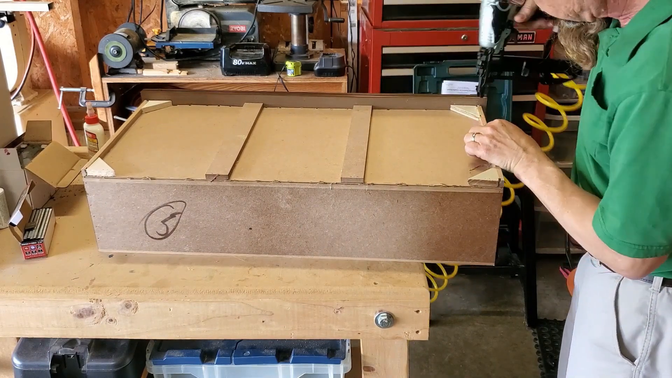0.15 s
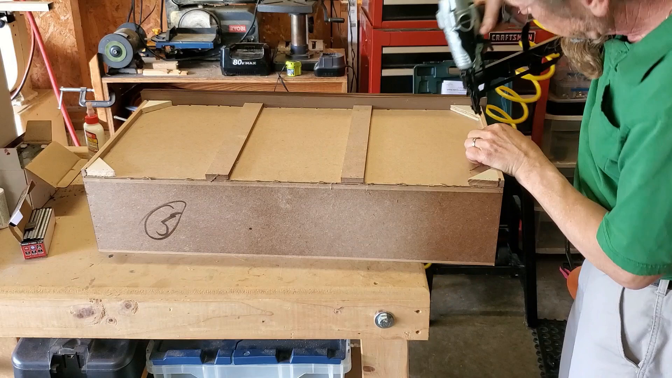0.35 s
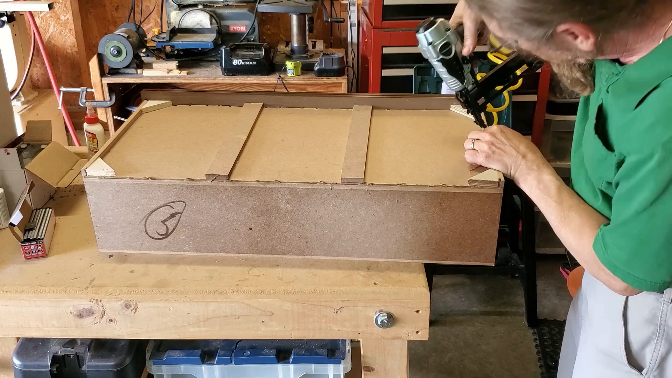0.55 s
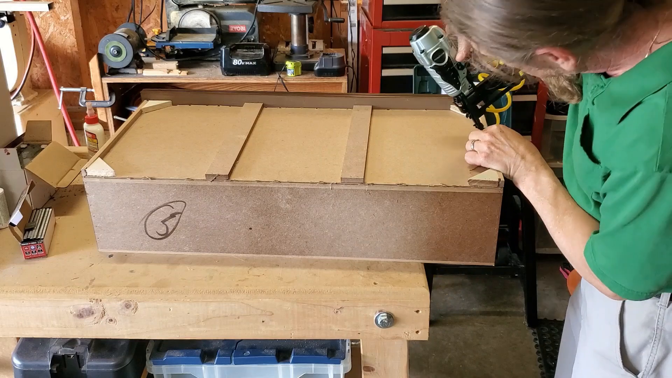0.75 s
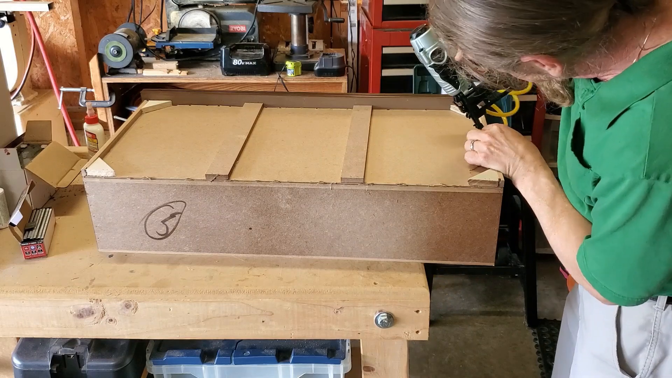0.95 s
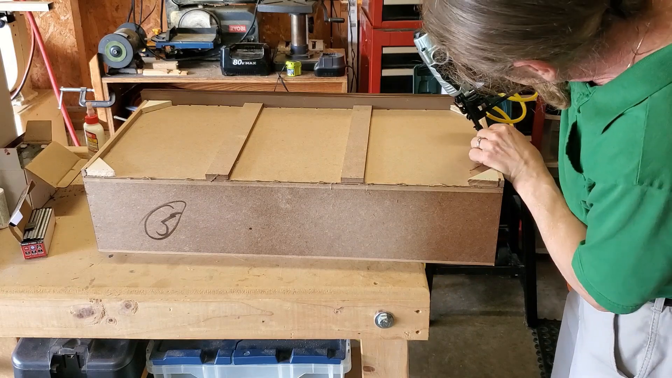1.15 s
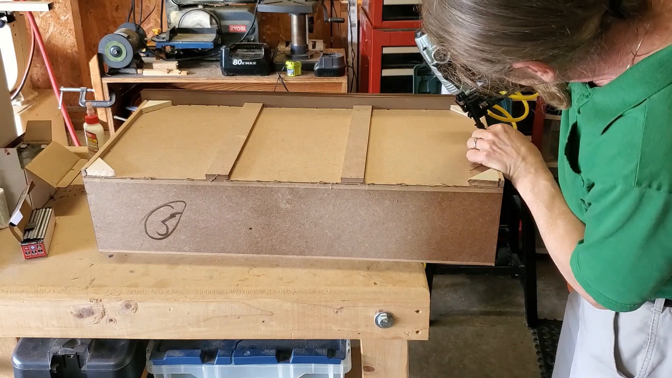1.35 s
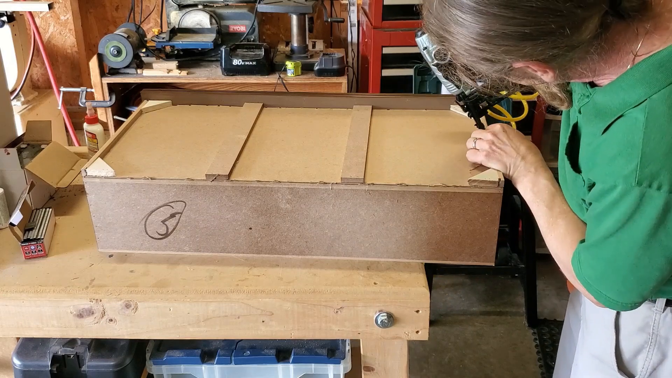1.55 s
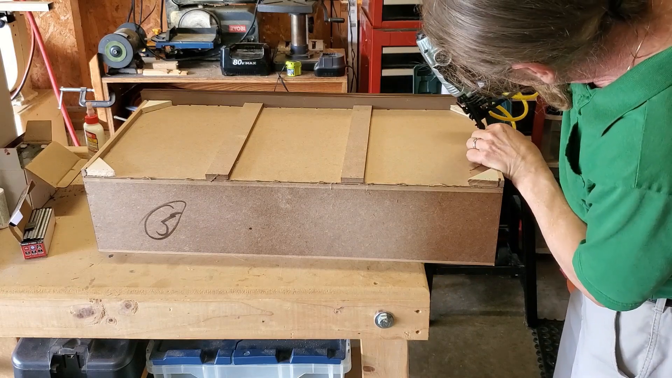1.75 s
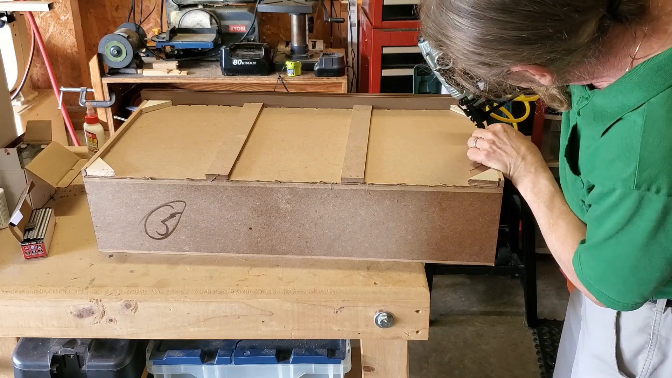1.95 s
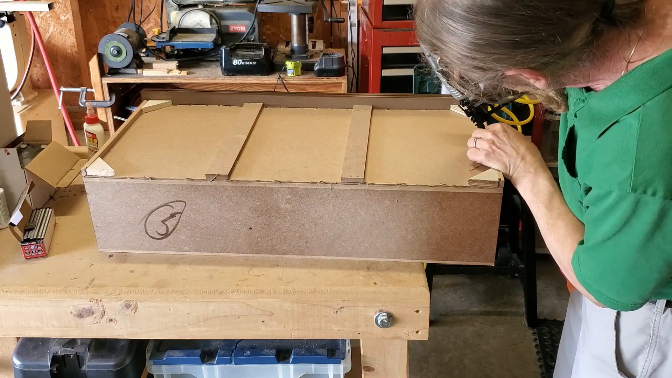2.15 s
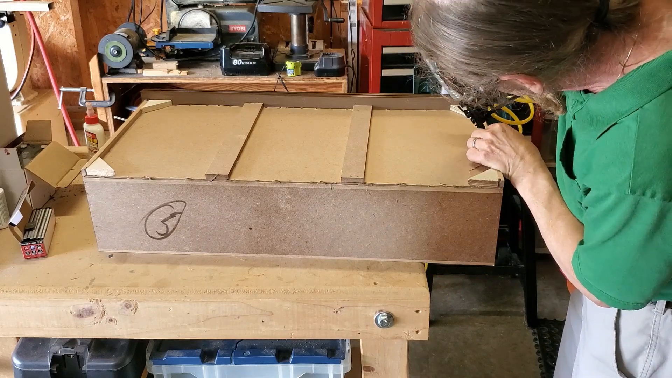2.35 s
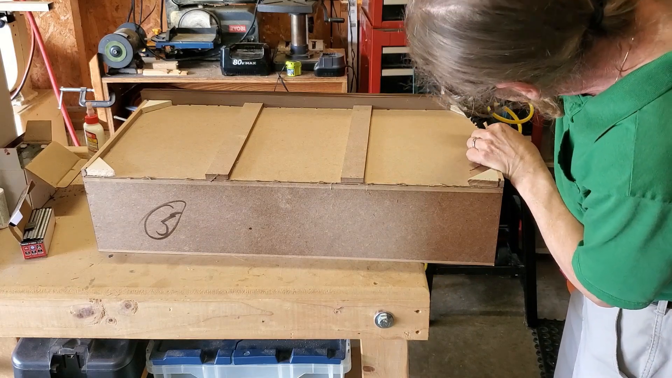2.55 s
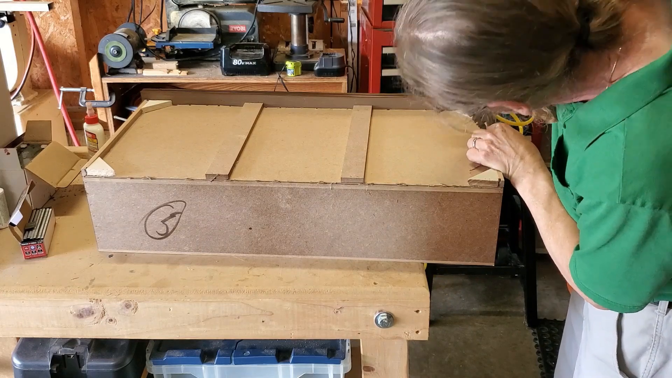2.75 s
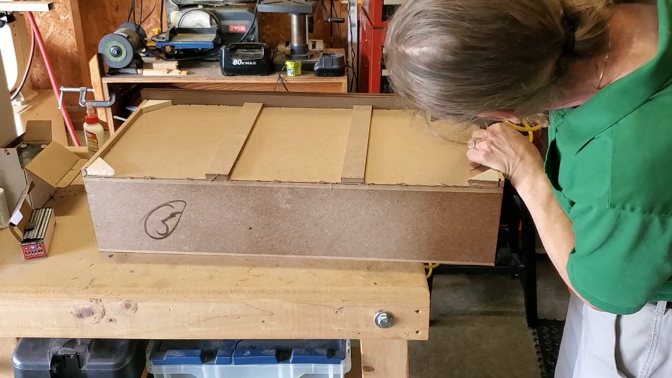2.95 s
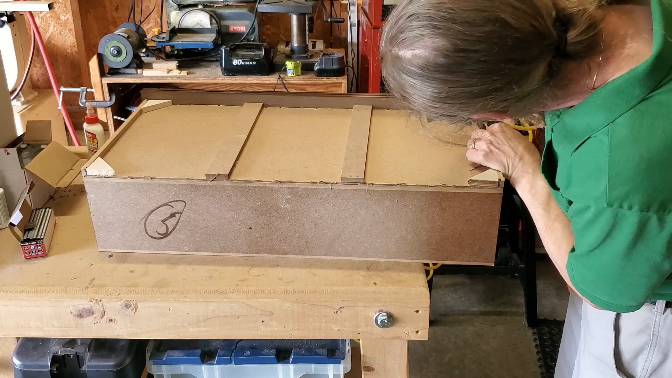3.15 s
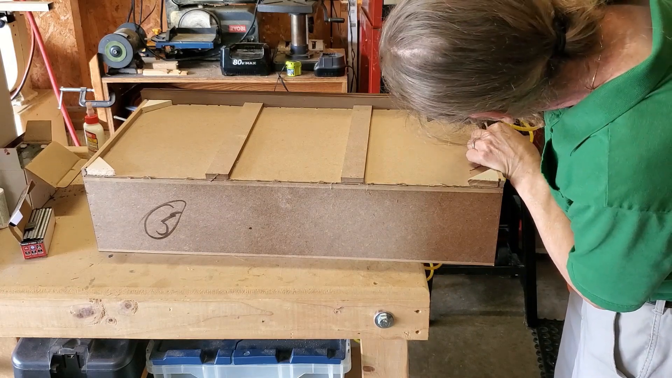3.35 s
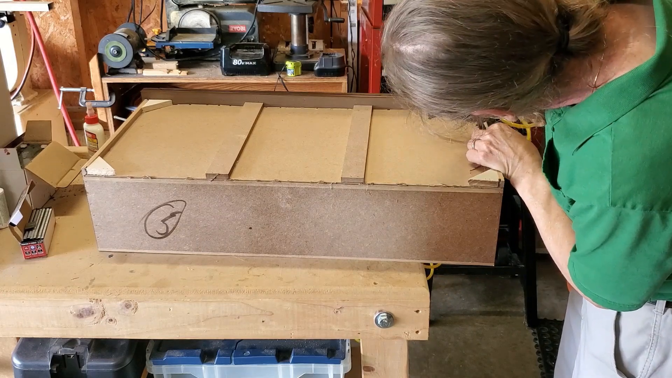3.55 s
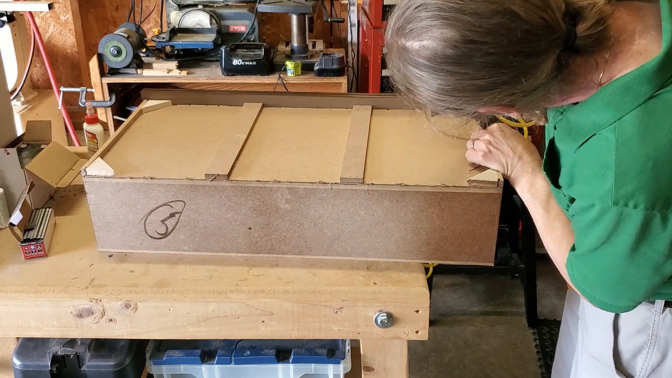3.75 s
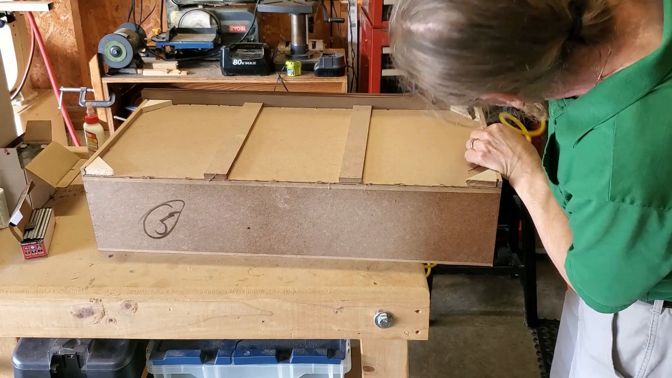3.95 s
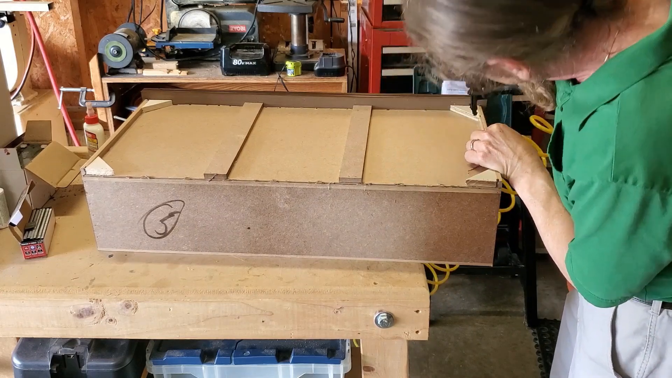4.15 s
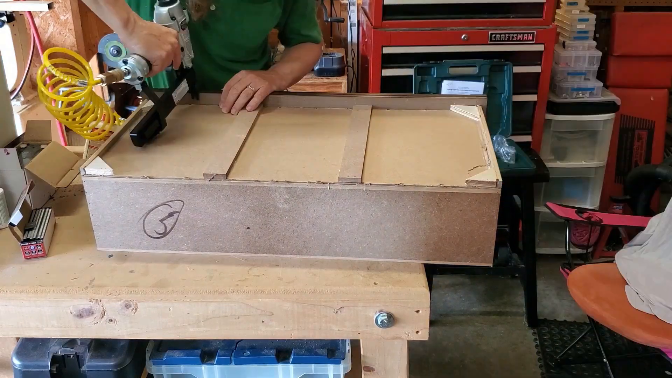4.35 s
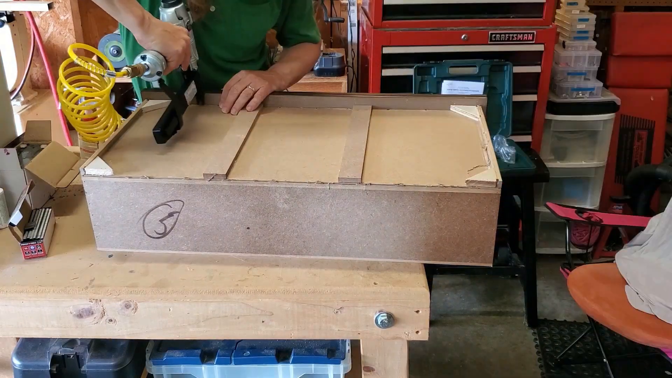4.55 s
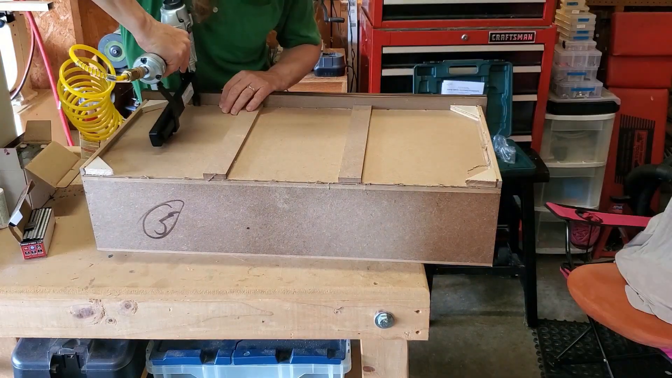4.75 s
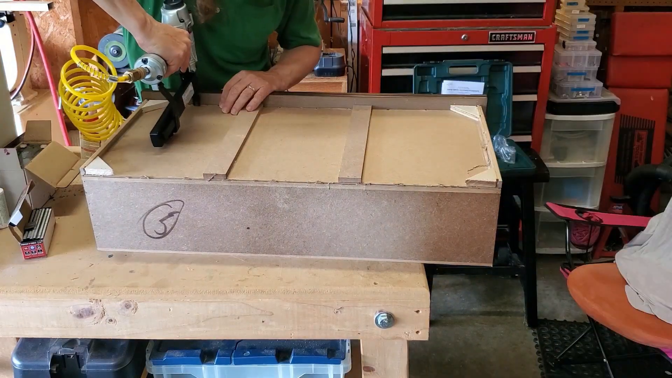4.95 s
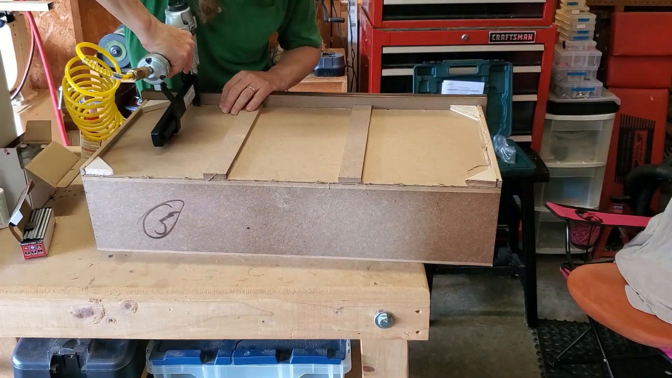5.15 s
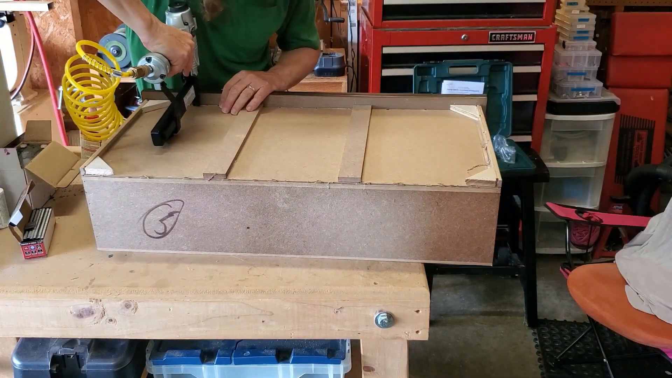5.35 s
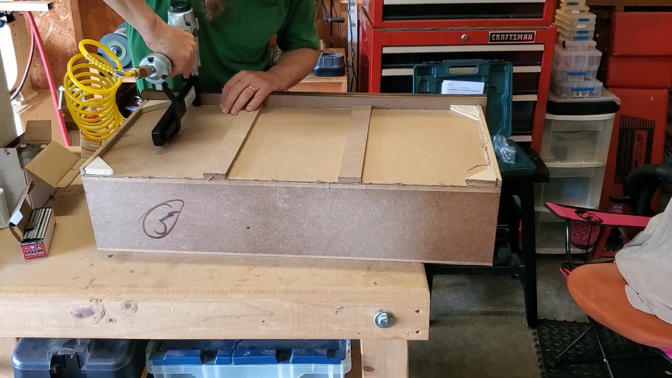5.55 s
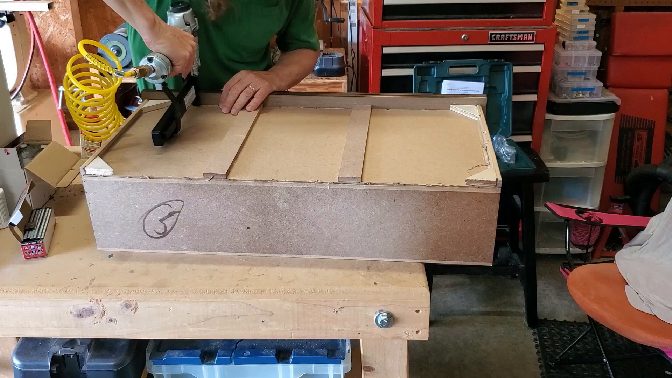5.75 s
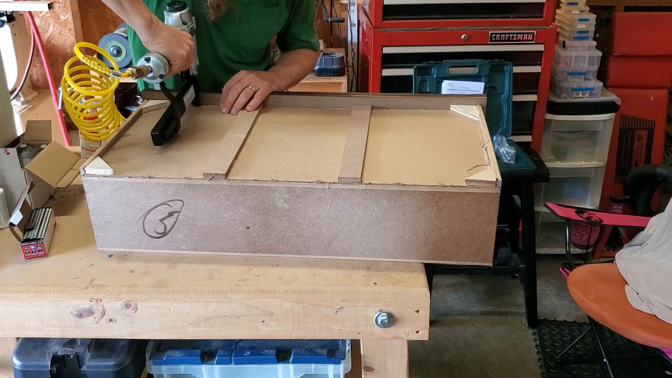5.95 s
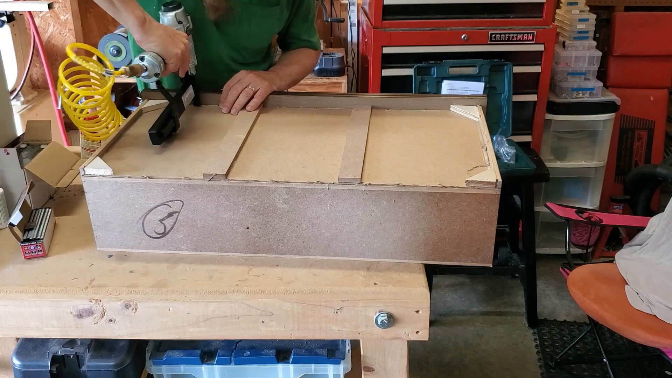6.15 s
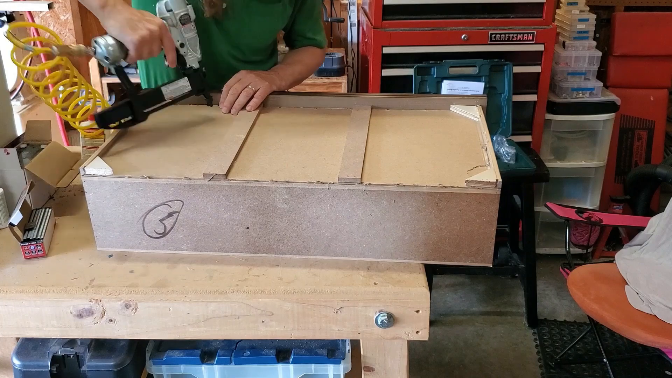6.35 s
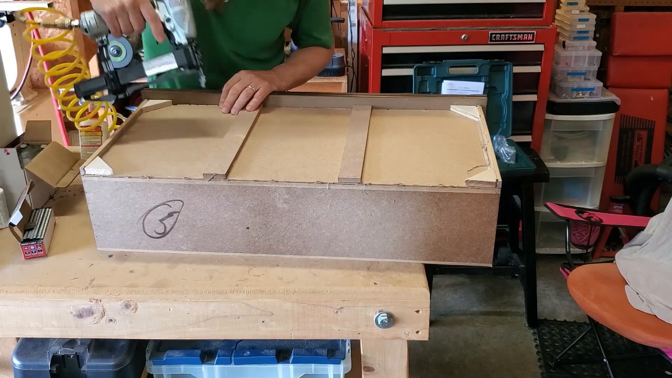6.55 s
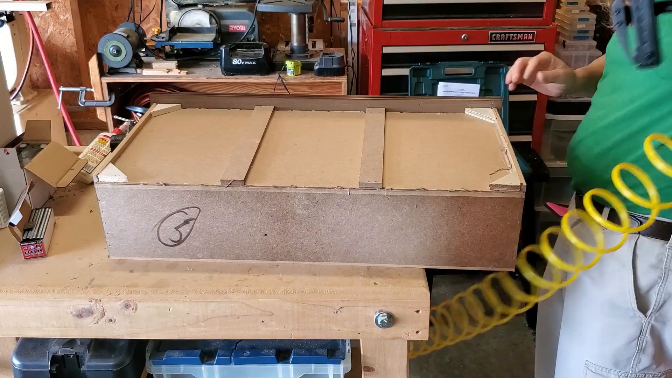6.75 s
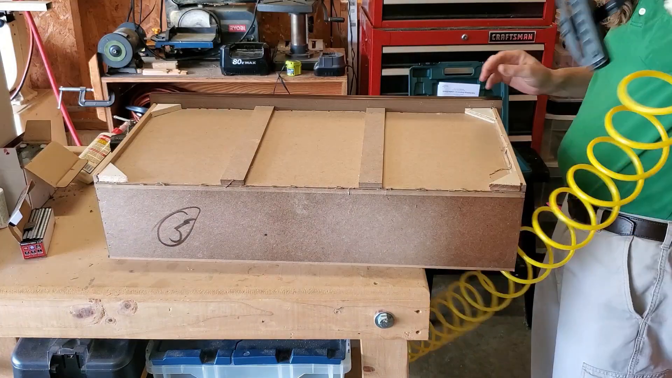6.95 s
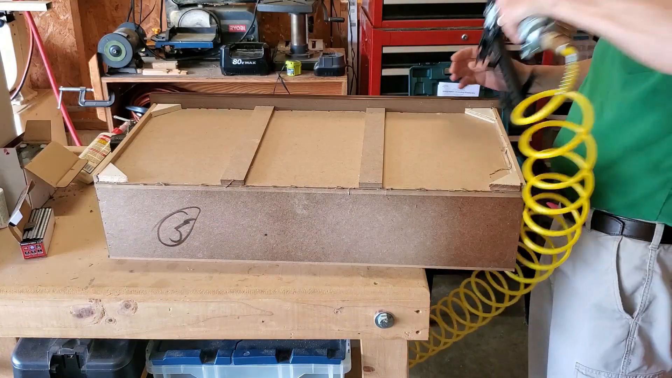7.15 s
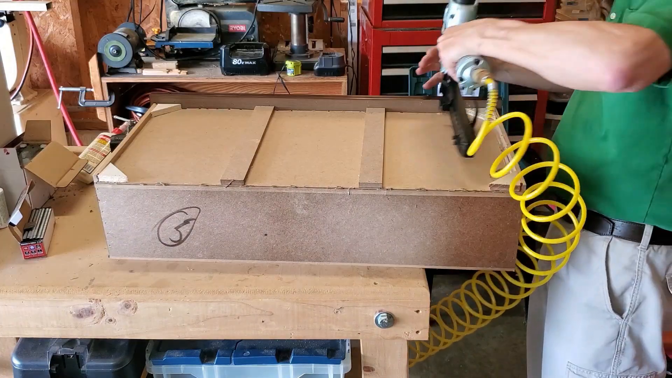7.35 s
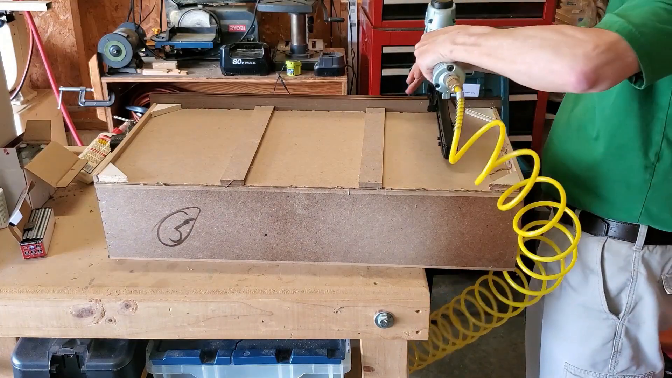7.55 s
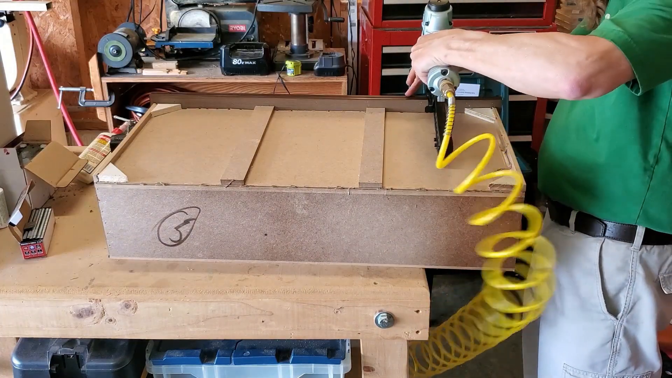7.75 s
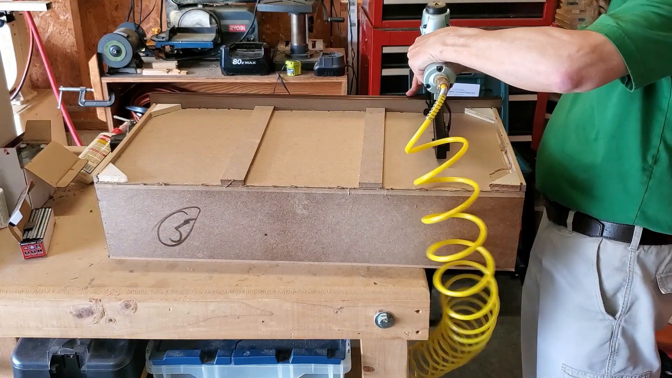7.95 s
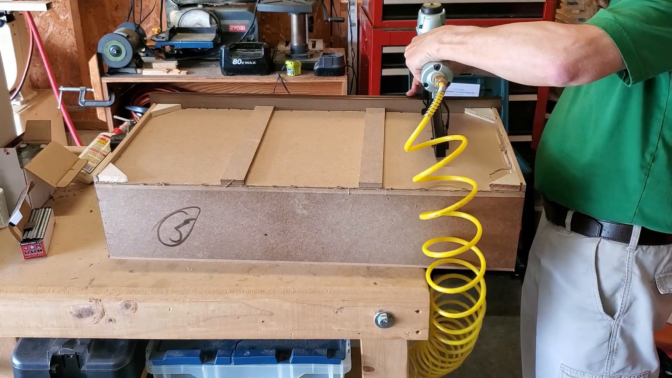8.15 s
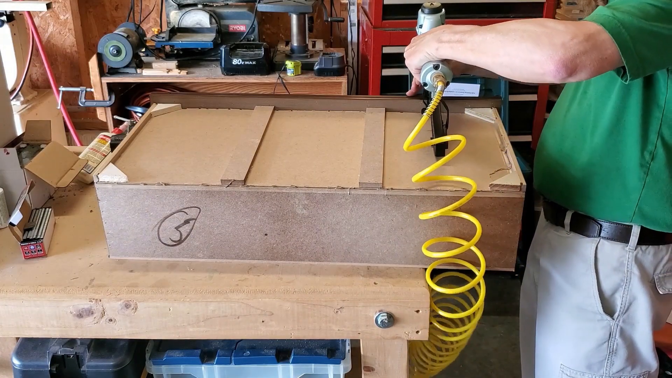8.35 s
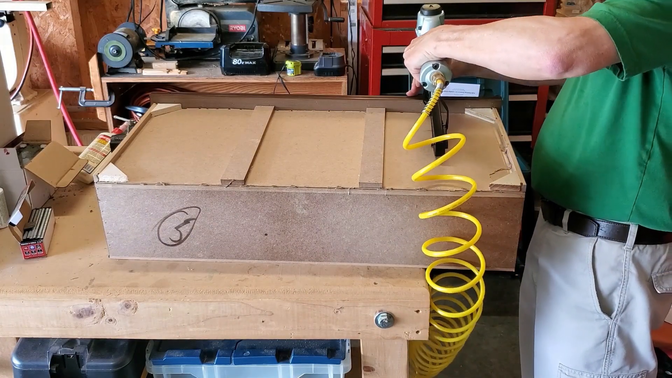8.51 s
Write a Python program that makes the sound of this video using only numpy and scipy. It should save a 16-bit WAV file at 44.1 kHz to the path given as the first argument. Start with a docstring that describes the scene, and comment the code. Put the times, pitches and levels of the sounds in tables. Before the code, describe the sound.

In a small workshop, faint knocks and rubbing come from hands and a tool on a wooden cabinet. A pneumatic stapler fires one loud, sharp shot that rings the panels, followed by a short hiss of air. After more soft bumps, a second shot and puff follow. Then the cabinet scrapes briefly over the bench and the tool clacks against it several times. A nearby microphone picks up a faint low drone underneath.

```python
"""A workshop bench, heard through a phone's two microphone ports. Hands and a pneumatic stapler knock
and rub on a board cabinet. At 3.5 s a staple goes into the near corner: pressure blast, crack, ringing
panels, the limiter ducking; the exhaust hisses as the trigger is let go. After more handling, the far
corner gets its staple at 5.9 s. From 7.6 s the cabinet slides over the bench and the tool is set down
on its front, in plain view of the microphone. A low drone and a faint hiss lie under it all."""
import sys
import numpy as np
from scipy import signal
from scipy.fft import rfft, irfft
from scipy.io import wavfile
from scipy.ndimage import uniform_filter1d, minimum_filter1d

SR = 44100
rng = np.random.default_rng(int(sys.argv[2]) if len(sys.argv) > 2 else 0)


def unload_audio(sound):
    """Save the sound as a 16-bit wav file, at the path given as the first command line argument."""
    columns = np.transpose(np.atleast_2d(sound))
    # keep every value between -1 and 1, then stretch to whole-number steps
    steps = np.round(np.clip(columns, -1, 1) * 32767)
    wavfile.write(sys.argv[1], SR, steps.astype(np.int16))


N = 378378
RING = 2 ** 15  # samples in one blow or echo
AGE, TIME = np.arange(RING) / SR, np.arange(N) / SR

# Levels in the tables are relative: each source adds its own trim.
# shots, near corner then far: t/s, blast/dB, blast time constant/s, crack/dB, panels/dB, air spit/dB,
# direct path of crack and panels/dB, room swell/s, left port lag/s
STAPLE_SHOTS = [(3.4716, 10, 0.00035, -6.5, -13, -30, -13, 0.0042, .00006),
                (5.9281, 14, 0.00048, -10.5, -18.5, -22, 10, 0.0038, -.0001)]
# crack spectra, near corner then far: f/Hz, level/dB
CRACK_SPECTRA = [
    [(35, -51.5), (60, -17.5), (193, -17), (227, -7), (315, -13.5), (540, -4.5), (968, -10), (2090, -2.5),
     (2350, -8), (3670, -11), (16000, -24)],
    [(35, -10), (60, -32), (108, -26), (172, -7.5), (417, -10), (480, -27), (1040, -9), (1660, -2.5),
     (7570, -21.5), (14600, -18.5), (16000, -19.5)],
]
# trigger let go: t/s, valve/dB, air/dB, air t60/s, piston return delay/s, piston knock/dB
TRIGGER_RELEASES = [(3.6644, -25.5, -11.5, 0.13, 0.031, -24), (6.1004, -41, -18.5, 0.075, .0335, -21)]
# cabinet modes: f/Hz, t60/s, level struck at the near corner/dB, at the far corner/dB, bumped/dB
CABINET_MODES = [(77.5, 0.21, -7, -9.5, -32), (181, 0.34, -6.5, -5, -6), (232, 0.14, 0, -8.5, 3.5),
                 (378.3, 0.68, -10, -15, -12), (434, 0.17, 0, -0.5, -4), (560, 0.12, 0, -17, 1.5),
                 (660, 0.083, -1, 14, -9), (776, 0.077, -0.5, 3, -1), (931, 0.46, -12, -1, -14),
                 (1127, 0.14, -13.5, 10.5, -14), (1228, 0.071, -9.5, 10, -7.5), (1493, 0.062, 0, -1, -10),
                 (2070, 0.12, -1.5, -21, -26)]
# stapler body and magazine modes: f/Hz, level/dB, t60/s
STAPLER_MODES = [(1600, -4, 0.02), (2670, 5, 0.013), (3240, 3, 0.026), (3560, 1, 0.02), (3854, 4.5, 0.02),
                 (6830, -10, 0.1)]
# tool on cabinet: t/s, strength/dB, weight behind it/dB, metal in the contact/dB,
# board pitch/Hz, board flex/dB, box pitch/Hz, box ring/dB
TOOL_KNOCKS = [(0.778, -60, 3, -0.5, 237, -2, 666, -1.5), (1.062, -55.5, -2, -2, 248, -2.5, 554, -13),
               (1.29, -44, -5, 6, 213, -15, 543, -6), (1.39, -48, -8, 9.5, 260, -11, 560, -8),
               (2.076, -52, -6, 0, 106, 15, 560, -4.5), (4.351, -51, 11, 3.5, 184, 13, 567, 7),
               (4.518, -52, 7, 13.5, 218, 7.5, 518, 2), (4.616, -48.5, -12, -2.5, 250, -18, 610, -15),
               (5.283, -47.5, 5, 0, 192, 11, 502, -8.5), (6.761, -39.5, -8.5, 0.5, 242, -6.5, 1326, -6.5),
               (6.897, -37.5, -11.5, -17.5, 225, -20, 750, -13),
               (7.001, -26.5, -12.5, -2.5, 179, -5, 694, -14.5), (7.207, -47, -10, -8, 250, -1, 660, -7),
               (7.264, -38, -3, -6.5, 197, -2.5, 650, -2), (7.602, -37, -1.5, -1.5, 285, -6.5, 1455, -6),
               (7.746, -33, 2, -17.5, 271, 4.5, 433, -9), (7.914, -30.5, -7, -2.5, 246, 1.5, 603, 2),
               (7.92, -31, -3, -11.5, 239, 0, 560, -3), (8.133, -35.5, 0.5, -7, 232, -1.5, 580, 3.5)]
# small sharp ticks, one just before the second shot: t/s, level/dB
SHARP_TICKS = [(0.706, -55.5), (4.402, -53), (5.298, -51.5), (5.916, -39), (6.751, -50), (8.1071, -37),
               (8.303, -49.5), (8.364, -54.5)]
# hands on the boards: t/s, strength/dB, softness/dB (more bench heave, less board)
HAND_BUMPS = [(0.354, -66.5, -9.5), (0.442, -63, -8.5), (1.827, -70.5, -18.5), (2.023, -59, -12.5),
              (2.082, -56.5, 20), (2.696, -53.5, 3), (4.681, -40, 2.5), (4.72, -46.5, 11),
              (4.788, -48.5, 8.5), (4.825, -54, 8), (4.962, -56, 14.5), (5.145, -42, 2.5),
              (5.322, -46.5, 7.5), (5.421, -46, 5.5), (8.097, -35.5, -2.5), (8.326, -44, -7.5),
              (8.503, -42, -2)]
# stretches of low rumble and faint handling noise: t/s, length/s
RUMBLE_STRETCHES = [(0.272, 3.8), (4.363, 1.58), (6.73, 2.1)]
# hands and tool rubbing on the cabinet: t/s, length/s, level/dB
RUB_STROKES = [(0.543, 0.07, -56.5), (1.7, 0.36, -53.5), (2.003, 0.05, -29), (4.34, 0.5, -51.5),
               (5.114, 0.2, -44.5), (6.773, 0.58, -42.5), (7.428, 0.29, -47.5), (7.661, 0.21, -34.5),
               (8.117, 0.26, -44.5), (8.477, 0.11, -52)]
# the cabinet creeps, then gives way: t/s, length/s, level/dB
CABINET_SLIDES = [(7.618, 0.21, -45.5), (7.809, 0.065, -26.5)]
# spectra of the sources: f/Hz, level/dB
EXHAUST_SPECTRUM = [(35, -26.5), (60, -8.5), (600, -1), (1500, -3.5), (6900, -4), (7940, -8.5), (14900, -1),
                    (16000, -4.5)]  # jet of air
THUD_SPECTRUM = [(40, -49.5), (65, -2.5), (120, -12.5), (170, -1), (220, -30.5), (400, -52.5)]  # bench under a knock
BOARD_SPECTRUM = [(130, -24.5), (200, 8.5), (300, 5.5), (430, 6), (630, 2.5), (830, -9), (1600, -7),
                  (6000, -94)]  # struck boards
CLACK_SPECTRUM = [(450, -27), (900, 4), (1600, 3), (3400, 2), (5000, -4), (8000, -28.5)]  # tool meeting wood
TICK_SPECTRUM = [(2000, -24), (4000, 7.5), (6800, 9.5), (8200, 2), (12000, 0.5), (15500, 1.5)]  # sharp ticks, also the spit of air
HEAVE_SPECTRUM = [(30, -14.5), (55, 3), (85, -1.5), (130, -7), (190, 5.5), (350, -17), (1500, -49)]  # bench under a soft, long push
RUB_SPECTRUM = [(90, -16), (170, 5), (250, 4), (420, -4), (620, -5), (1000, -19), (3000, -29), (15000, -58)]  # rubbed boards
SCRAPE_SPECTRUM = [(130, -38), (285, 5), (480, -27), (1700, -5.5), (7800, -24), (15000, -25.5)]  # sliding cabinet
RUMBLE_SPECTRUM = [(20, -32.5), (40, -9.5), (56, 4), (85, -0.5), (130, -8), (250, -56)]  # low rumble
DRONE_SPECTRUM = [(20, -6.5), (64, 8), (150, -9.5), (400, -19), (3000, -36.5)]  # the still workshop
HISS_SPECTRUM = [(100, -6.5), (1000, -10), (2500, -8), (6500, -17.5), (15000, -25.5)]  # rustle and background hiss
# the workshop's reverberation: f/Hz, t60/s
WORKSHOP_DECAY = [(80, 0.43), (250, 0.4), (3000, 0.43), (6500, 0.39), (10000, 0.33), (15000, 0.23)]

FAR_CORNER_S = (4.2, 6.5)  # the tool is at the far corner
FAR_THUD_DB, OVERHANG_THUD_DB = 2.5, -7  # that corner lies on the bench; elsewhere the cabinet overhangs
FRONT_FROM_S, FRONT_DIRECT_DB = 7.7, 4  # tool in view of the microphone: more direct sound
BUMPED = 2  # the cabinet's third set of mode levels, after the two corners
TOP_HZ = 16000


def shots():
    """The piston's blast with a spit of air, the crack of the staple going in, and the ringing panels."""
    out = np.zeros((2, N))
    for corner, shot in enumerate(STAPLE_SHOTS):
        s, blast_db, blast_s, crack_db, panel_db, spit_db, direct_db, swell, lag = shot
        # a steep overpressure, then a longer suction, with no net flow
        u = AGE / blast_s
        pressure = np.gradient(u ** 2 / (u + 0.29) * np.exp(-u))
        blast = undb(blast_db - 12.5) * pressure / pressure.max()
        add(out, s, heard(blast, 11.0, swell, lag))
        spit = burst(crackle(TICK_SPECTRUM, t60=0.076), spit_db - 2.5)
        add(out, s - .001, heard(spit, 13.0, swell, lag))
        # the driver slams the staple home just behind the blast
        driver = burst(crackle(CRACK_SPECTRA[corner], t60=0.03), crack_db - 14.5)
        add(out, s + 0.0014, heard(driver, 11.0, swell, lag))
        crack = burst(crackle(CRACK_SPECTRA[corner], t60=0.085), crack_db)
        body = crack + burst(panels(corner), panel_db)
        add(out, s, heard(body, direct_db - 14.0, swell, lag))
    return out


def panels(place):
    """The cabinet's modes ring with strengths set by the place of striking."""
    return ring([(hz, levels[place], t60) for hz, t60, *levels in CABINET_MODES], scatter_db=2)


def exhaust():
    """The valve snaps back, the cylinder dumps its air in a turbulent jet, and the piston knocks home."""
    out = np.zeros((2, N))
    for s, valve_db, air_db, air_t60, return_s, piston_db in TRIGGER_RELEASES:
        valve = burst(ring([(2450, 0, 0.0025)]) * (1 - fade(t60=0.002)), valve_db)
        jolt = burst(ring([(250, 0, 0.0088)]), valve_db - 5.0)
        add(out, s, undb(-11.0) * heard(valve + jolt, direct_db=12.5, swell=0.011, lag=.00005))
        jet = burst(crackle(EXHAUST_SPECTRUM, air_t60), air_db)
        add(out, s + 0.0042, heard(jet, direct_db=-6.5, swell=0.0042))
        # the finest hiss beams straight at the microphone
        beam = [crackle([(3000, -28.5), (8000, -6.5), (13000, -1.5)], t60=0.02) for _ in range(2)]
        add(out, s + 0.0018, np.array([burst(port, air_db - 7.5) for port in beam]))
        piston = crackle([(200, 2.0), (700, -3.0), (2000, -2.5), (4500, -12.5)], t60=0.0292)
        add(out, s + return_s, heard(burst(piston, piston_db), direct_db=-4.0, swell=0.0017))
    return out


def knocks():
    """Tool meets cabinet: a thump, a hollow ring and a clack; bare metal adds a tick and rings."""
    out = np.zeros((2, N))
    for s, strength_db, weight_db, metal_db, board_hz, flex_db, box_hz, box_db in TOOL_KNOCKS:
        panel_db, tick_db = strength_db + weight_db, strength_db + metal_db
        thud_db = panel_db + (FAR_THUD_DB if FAR_CORNER_S[0] < s < FAR_CORNER_S[1] else OVERHANG_THUD_DB)
        front_db = FRONT_DIRECT_DB * (s > FRONT_FROM_S)
        # the struck board flexes a few times and the box answers with a pair of modes
        flex = burst(ring([(board_hz, 0, 0.055)]) * (1 - fade(t60=0.022)), strength_db + flex_db)
        pair = [(hz, 0, 0.033) for hz in (box_hz, box_hz * 1.108)]
        box = burst(ring(pair, scatter_db=2), strength_db + box_db)
        thump = wood(THUD_SPECTRUM, thud_db, panel_db, t60=0.034, rise=0.0042) + flex + box
        add(out, s, heard(thump, direct_db=-3.0 + front_db, swell=0.0016, lag=.00003))
        clack = burst(crackle(CLACK_SPECTRUM, t60=0.0382, rise=0.0099), strength_db + 1.0)
        clack += burst(struck_spot(), strength_db - 6.5)
        # a rubber or plastic contact lasts longer than a metal one and dulls the clack
        edge_hz = min(5250 * 2 ** (metal_db / 9.5), TOP_HZ)
        clack = signal.sosfilt(signal.butter(2, edge_hz, fs=SR, output="sos"), clack)
        tick = burst(crackle(TICK_SPECTRUM, t60=0.033, rise=0.0038), tick_db - 8.5)
        metal = burst(ring(STAPLER_MODES, scatter_db=3), tick_db - 19.0)
        contact = clack + tick + metal
        add(out, s - .001, heard(contact, direct_db=-7.0 + front_db, swell=0.00048, lag=.00004))
    return out


def wood(bench_spectrum, thud_db, panel_db, t60, rise):
    """A contact thuds the bench and rings the boards; a soft one pushes for longer."""
    thud = burst(crackle(bench_spectrum, t60=0.073), thud_db - 1.5)
    boards = burst(crackle(BOARD_SPECTRUM, t60, rise), panel_db - 4.5)
    return thud + boards + burst(panels(BUMPED), panel_db - 4.0)


def struck_spot(count=9, low_hz=1119, high_hz=3044, t60=0.012):
    """Every spot on the cabinet has its own few upper modes, drawn afresh for each blow."""
    pitches = low_hz * (high_hz / low_hz) ** ((np.arange(count) + rng.random(count)) / count)
    return ring([(hz, 0, t60) for hz in pitches], scatter_db=4)


def ticks():
    """Small sharp ticks, each with a brief bright ring; one comes just before the second shot."""
    out = np.zeros((2, N))
    for s, db in SHARP_TICKS:
        ping = burst(ring(STAPLER_MODES, scatter_db=3), db - 4.0)
        tick = burst(crackle(TICK_SPECTRUM, t60=0.045), db - 7.0)
        front_db = FRONT_DIRECT_DB * (s > FRONT_FROM_S)
        add(out, s, heard(ping + tick, direct_db=-6.5 + front_db, swell=0.00072))
    return out


def bumps():
    """Hands press and shift on the boards: dull wood with a cushioned onset."""
    out = np.zeros((2, N))
    for s, strength_db, soft_db in HAND_BUMPS:
        push = wood(HEAVE_SPECTRUM, strength_db + soft_db, strength_db - soft_db, t60=0.074, rise=0.03)
        cushioned = colour(push * (1 - fade(t60=0.0098)), [(300, -3.5), (1500, -8), (8000, -16)])
        add(out, s - .002, heard(cushioned, direct_db=-2.0, swell=0.0012))
    return out


def handling():
    """Rubbing on the boards, with a low rumble and a faint rustle, and the cabinet scraping along."""
    effort = undb(-69) * sum(stroke(s, length, attack=.2) for s, length in RUMBLE_STRETCHES)
    effort += sum(undb(db) * stroke(s, length, attack=.05) for s, length, db in RUB_STROKES)
    push = sum(undb(db) * stroke(s, length, attack=0.076, release_t60=0.063)
               for s, length, db in CABINET_SLIDES)
    rub = friction(RUB_SPECTRUM, per_s=140, spread_db=-0.5) * effort * hand_pressure()
    scrape = friction(SCRAPE_SPECTRUM, per_s=1500, spread_db=2.0) * push
    # rumble and rustle come with the faintest rubbing and grow more slowly than it does
    stir = (effort / undb(-72.5)) ** 0.18 * effort / (effort + undb(-90.5))
    rumble = undb(-61.5) * noise(RUMBLE_SPECTRUM)
    rustle = undb(-75) * np.array([noise(HISS_SPECTRUM) for _ in range(2)])
    contact = undb(-5.5) * rub + undb(-3) * scrape
    return heard(contact, direct_db=-6.0, swell=0.02) + stir * (rumble + rustle)


def friction(spectrum, per_s, spread_db):
    """Stick and slip: dense small catches of uneven size."""
    catches = (rng.random(N) < per_s / SR) * rng.choice([-1, 1], N)
    sizes = undb(spread_db * np.minimum(rng.exponential(size=N), 3))
    return steady(colour(catches * sizes, spectrum))


def stroke(start, length, attack, release_t60=0.05):
    """An envelope that builds up, holds and dies away."""
    age = TIME - start
    build = np.sin(np.pi / 2 * np.clip(age / attack, 0, 1)) ** 2
    return build * np.exp(-np.log(1000) * np.clip((age - length) / release_t60, 0, 2))


def hand_pressure(changes_per_s=12, spread_db=4):
    """The hands' pressure wavers: a gain gliding between random levels."""
    hold = int(SR / changes_per_s)
    steps = np.repeat(rng.standard_normal(N // hold + 1), hold)
    return undb(spread_db * uniform_filter1d(steps, hold)[:N])


def room_tone():
    """The still workshop: a low drone and a faint hiss."""
    hiss = np.array([noise(HISS_SPECTRUM) for _ in range(2)])
    return undb(-78.5) * noise(DRONE_SPECTRUM) + undb(-84.0) * hiss


def workshop_echo(swell, port_hz=1300):
    """The cluttered room's echo from one spot; bass reaches both microphone ports alike."""
    hz = np.fft.rfftfreq(RING, 1 / SR)
    alike = np.sinc(hz / port_hz / 2) * np.exp(-hz / port_hz / 2)
    mid, side = rfft(rng.standard_normal((2, RING)))
    field = mid * np.sqrt((1 + alike) / 2) + np.outer([1, -1], side * np.sqrt((1 - alike) / 2))
    build = 1 - np.exp(-(np.maximum(AGE - .003, 0) / swell) ** 2)
    echo = 0
    for centre, t60 in WORKSHOP_DECAY:
        band = along([(f, f == centre) for f, _ in WORKSHOP_DECAY], hz)
        tail = build * fade(t60)
        echo = echo + irfft(field * band) * tail / np.sqrt(np.sum(tail ** 2))
    return echo


def heard(x, direct_db, swell, lag=0):
    """A source at the microphone: the direct path, lag seconds later on the left, plus the room."""
    n = np.arange(len(x))
    direct = np.array([np.interp(n - d * SR / 2, n, x, left=0) for d in (lag, -lag)])
    return undb(direct_db) * direct + signal.fftconvolve(x[None], workshop_echo(swell))[:, :len(x)]


def crackle(spectrum, t60, rise=0.00065, size=2 ** 13):
    """Vibration that swells and dies, too dense for any one pitch to stand out."""
    x = rng.standard_normal(size) * (fade(t60) * (1 - fade(rise)))[:size]
    for _ in range(3):  # even out the spectrum, keeping the burst's place in time
        bins = rfft(x)
        x = irfft(bins / (np.abs(bins) + 1e-12)) * (np.arange(size) < size // 2)
    return np.pad(colour(x, spectrum), (0, RING - size))


def ring(modes, scatter_db=0):
    """Damped modes (f/Hz, level/dB, t60/s); scatter weights them differently at each blow."""
    return sum(rng.choice([-1, 1]) * undb(db + scatter_db * rng.standard_normal()) * fade(t60)
               * np.sin(2 * np.pi * hz * AGE) for hz, db, t60 in modes)


def noise(spectrum):
    """Coloured noise at rms 1."""
    return steady(colour(rng.standard_normal(N), spectrum))


def colour(x, spectrum, size=4096):
    """Causal filter with a response of (f/Hz, level/dB) points, built from its cepstrum."""
    cepstrum = irfft(np.log(undb(along(spectrum, np.fft.rfftfreq(size, 1 / SR)))))
    cepstrum[1:size // 2] *= 2
    cepstrum[size // 2 + 1:] = 0
    return signal.fftconvolve(x, irfft(np.exp(rfft(cepstrum))))[:len(x)]


def along(points, hz):
    """Read (f/Hz, value) points on a log-frequency axis."""
    f, value = np.transpose(points)
    return np.interp(np.log(hz + 0.0013), np.log(f), value)


def undb(db):
    """Decibels to gain."""
    return 10 ** (np.asarray(db) / 20)


def fade(t60):
    """A decay of 60 dB in t60 seconds."""
    return np.exp(-np.log(1000) * AGE / max(t60, 1e-4))


def burst(x, db):
    """Scale a blow so that its energy, spread over 30 ms, has this level."""
    return x * undb(db) / np.sqrt(np.sum(x ** 2) / (.03 * SR))


def steady(x):
    """Scale to rms 1."""
    return x / np.sqrt(np.mean(x ** 2))


def add(out, s, x):
    """Mix a stereo sound in at time s."""
    start = int(s * SR)
    out[:, start:start + x.shape[1]] += x[:, :N - start]


def scene():
    """The bench from the microphone's position; the treble is a little louder on the left."""
    left, right = shots() + exhaust() + knocks() + ticks() + bumps() + handling() + room_tone()
    tilt = [(200, .1), (2000, .7), (13000, 1.3)]
    return np.array([colour(left, tilt), colour(right, [(hz, -db) for hz, db in tilt])])


def record(dry, ceiling_db=-1.2, release_db_per_s=300, bass_hz=42):
    """The phone: bass roll-off, a look-ahead limiter that ducks under the shots, then a treble cut."""
    x = signal.sosfilt(signal.butter(2, bass_hz, "high", fs=SR, output="sos"), dry)
    over_db = np.maximum(20 * np.log10(np.abs(x).max(axis=0) + 1e-9) - ceiling_db, 0)
    recovery_db = release_db_per_s * TIME
    duck_db = np.maximum.accumulate(over_db + recovery_db) - recovery_db
    gain = uniform_filter1d(minimum_filter1d(undb(-duck_db), size=89), size=89)
    return signal.sosfilt(signal.ellip(10, .2, 80, TOP_HZ, fs=SR, output="sos"), x * gain)


dry = scene()
out = record(dry)
unload_audio(out)
```